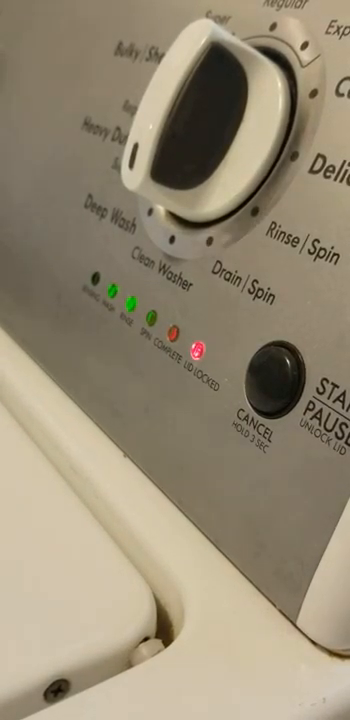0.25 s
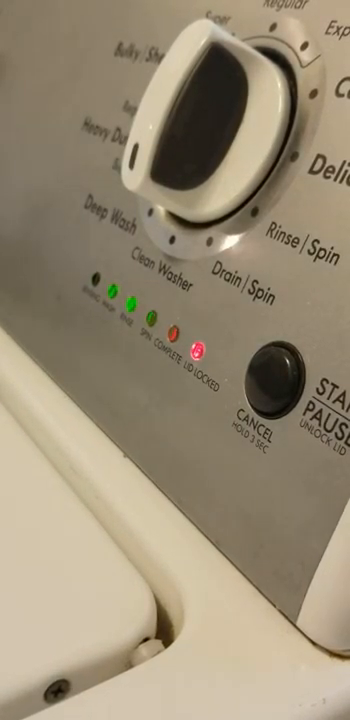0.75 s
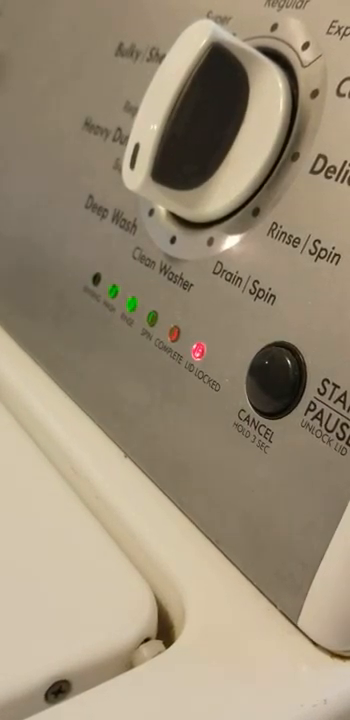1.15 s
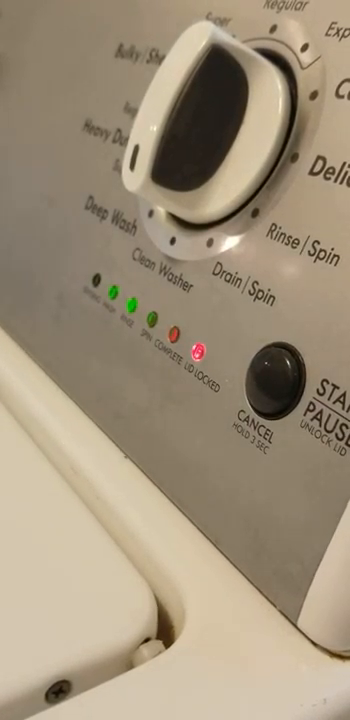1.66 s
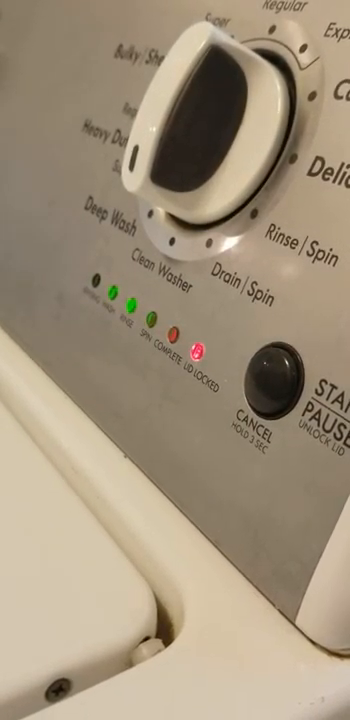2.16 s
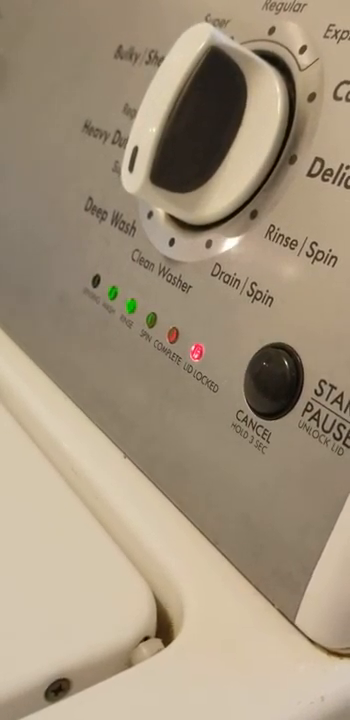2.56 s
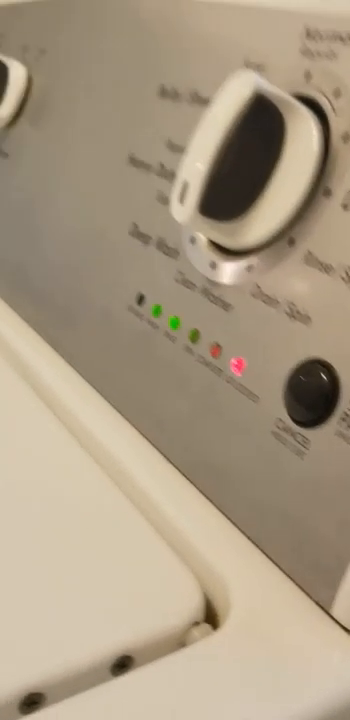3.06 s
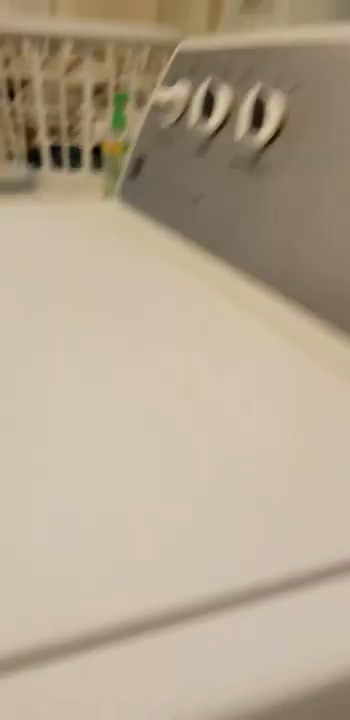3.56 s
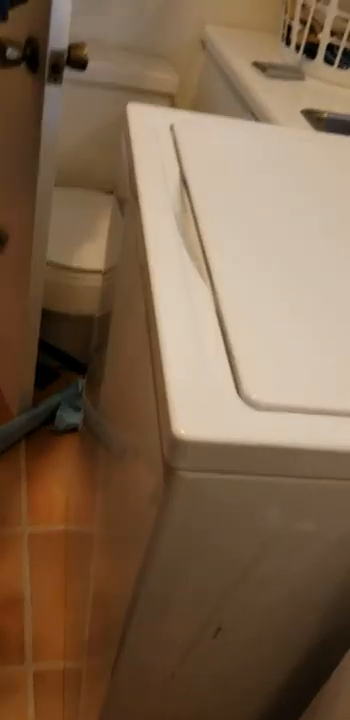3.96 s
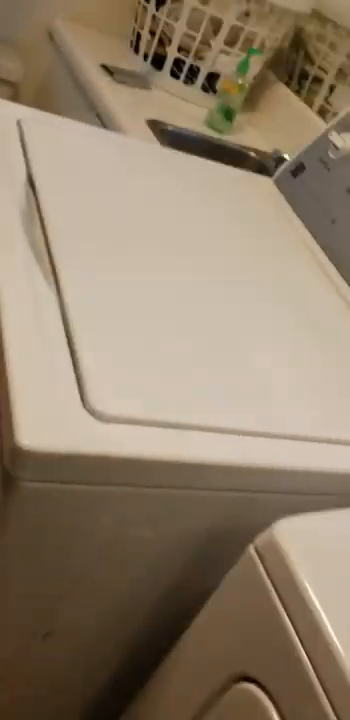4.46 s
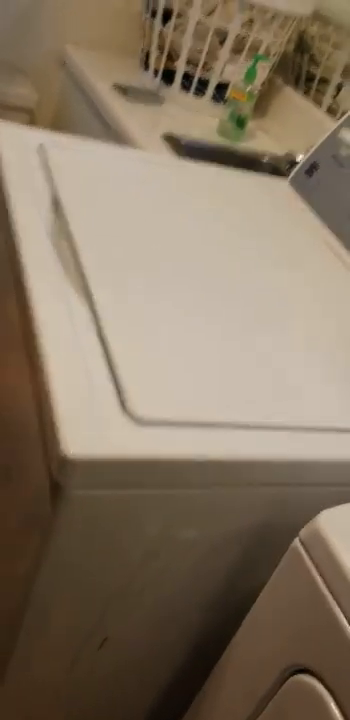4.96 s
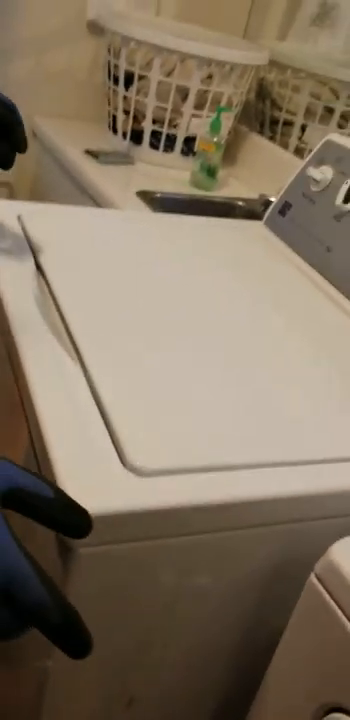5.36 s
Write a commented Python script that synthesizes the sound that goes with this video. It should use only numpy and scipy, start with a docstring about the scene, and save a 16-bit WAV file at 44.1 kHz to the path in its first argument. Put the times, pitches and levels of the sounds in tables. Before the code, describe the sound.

Inside a closed washing machine, water sprays in a bright, ragged hiss broken by many short splashes. The metal cabinet gives a low murmuring boom, strongest in the first two seconds. Around the middle come heavier spatters and small bubbly drips. Later the boom thins and a faint hollow gurgle shows more. Close stereo microphone in a small laundry room, brighter on the left.

```python
"""A spray hiss breaks into short splashes of changing colour: water sputters into a washing machine's closed tub.
Banded droplet noise makes the spray; random slugs of water ring the cabinet, lid and tub air
as a low boom, a murmur and a gurgle. Rising bubble tones mark single drops over a soft broad rumble.
The left microphone port faces the machine and hears more treble, in a small room."""
import sys
import numpy as np
from scipy import signal
from scipy.io import wavfile

SR = 44100
rng = np.random.default_rng(int(sys.argv[2]) if len(sys.argv) > 2 else 0)


def decibels_to_gain(level_db):
    """Convert a level in decibels to a linear amplitude gain (20 dB per decade)."""
    exponent = np.asarray(level_db, float) / 20
    return 10 ** exponent


def master_out(mix):
    """Clip the mix to full scale and print it as 16-bit PCM to the path in sys.argv[1]."""
    frames = np.transpose(np.atleast_2d(mix))
    ceiling = np.clip(frames, -1, 1)
    pcm = np.round(ceiling * 32767).astype(np.int16)
    wavfile.write(sys.argv[1], SR, pcm)


N = 247842  # samples

# colour of the pipe and room rumble, relative: frequency_hz [Hz], level_db [dB per Hz]
RUMBLE_COLOUR = [(30, -27), (161, -5), (241, 3.5), (383, -6), (599, -17), (1200, -42)]
# how hard the cabinet is shaken: start_s [s], level_db [dB]
CABINET_SHAKE = [(0.0, -34), (0.9, -33), (1.14, -31), (1.45, -28), (1.71, -34), (2.75, -38.5),
                 (2.96, -29.5), (3.4, -40.5), (3.79, -33.5), (3.96, -42.5), (4.08, -38), (4.5, -41.5),
                 (4.75, -33), (5.31, -42)]
# sheet-metal resonances, relative: pitch_hz [Hz], width_hz [Hz], level_db [dB]
CABINET_MODES = [(89.6, 28, -22.5), (221.6, 12.4, -7), (257.7, 11.2, -2), (328.5, 22.3, -17),
                 (437, 42, -22.5)]
# lid resonances, relative: pitch_hz [Hz], width_hz [Hz], level_db [dB]
LID_MODES = [(137.2, 7.8, 0), (519, 33.5, -0.5)]
# resonances of the air in the tub, relative: pitch_hz [Hz], width_hz [Hz], level_db [dB]
TUB_AIR_MODES = [(589.5, 51, 5), (655, 67, -0.5), (713, 90, -2), (816, 98, -4.5)]
# drops that trap a few bubbles and ring: start_s [s], level_db [dB], pitch_hz [Hz]
DROPS = [(2.381, -25, 3640), (2.384, -24, 2730), (3.105, -25, 4060), (3.216, -23, 4040),
         (3.254, -22.5, 5200), (3.3773, -23.5, 2555), (3.551, -24, 2550), (3.568, -36, 970),
         (3.627, -27.5, 2680), (4.243, -35, 2600), (4.514, -35, 1080), (5.063, -27, 3730),
         (5.421, -29.5, 614)]
# strength of the flow as spray hiss, before colouring: start_s [s], level_db [dB]
FLOW_STRENGTH = [(0.0, -32), (0.28, -27.5), (0.6, -29), (1.36, -28.5), (2.96, -28.5), (4.5, -30.5),
                 (5.62, -31.5)]
# loudest splashes, before colouring: start_s [s], level_db [dB], centre_hz [Hz],
# top_db [dB, top-treble share], t60_s [s]
LOUD_SPLASHES = [(0.26, -18.5, 4100, -16, 0.096), (0.4396, -22, 5600, -15, 0.21),
                 (0.7594, -22.5, 5470, -7, 0.3), (0.9177, -21, 5370, -15, 0.93),
                 (1.049, -20, 5200, -35, 0.16), (1.149, -18.5, 2630, -27, 0.31),
                 (1.254, -20.5, 4160, 5, 0.068), (1.306, -12.5, 4370, -24, 0.11),
                 (1.413, -18, 3300, -6, 0.12), (1.481, -25, 9000, 6, 0.062), (1.551, -21.5, 4300, -6, 0.42),
                 (1.598, -14.5, 3580, -5, 0.13), (1.77, -21, 5000, -11, 0.4), (2.022, -19, 3900, -2, 0.15),
                 (2.207, -14, 3900, -3, 0.13), (2.38, -19, 3080, -36, 0.27),
                 (2.411, -18.5, 2900, -16, 0.17), (2.775, -16.5, 2720, -18, 0.17),
                 (2.8216, -24.5, 5300, 11, 0.089), (2.887, -15, 4160, -5, 0.25),
                 (2.984, -19, 3740, -19, 0.28), (3.095, -22, 3900, -13, 0.54), (3.152, -20, 5900, -15, 0.1),
                 (3.253, -17.5, 4970, -25, 0.18), (3.371, -19, 2850, -11, 0.23),
                 (3.5457, -12.5, 3200, -23, 0.15), (3.563, -11, 5650, -8, 0.16),
                 (3.6232, -20.5, 2830, -25, 0.58), (3.7445, -16, 2950, -126, 0.17),
                 (3.864, -22, 4200, 8, 0.048), (3.922, -20, 6160, -12, 0.14), (3.998, -24, 3780, -6, 0.94),
                 (4.155, -18.5, 3230, -19, 0.063), (4.201, -22, 6600, -2, 0.079),
                 (4.2396, -20, 3700, -14, 0.61), (4.3314, -20.5, 5240, -1, 0.15),
                 (4.39, -24, 5500, 3, 0.094), (4.407, -18, 4200, -22, 0.29), (4.511, -19, 2010, -16, 0.14),
                 (4.523, -19.5, 5100, -2.5, 0.35), (4.613, -20, 4270, -14, 0.19),
                 (4.74, -24.5, 4600, -14, 0.4), (4.837, -23.5, 5340, 0, 0.42), (4.894, -24, 5330, 5, 0.34),
                 (5.099, -21.5, 4420, -5, 0.24), (5.159, -21, 1960, -18, 0.14),
                 (5.203, -21, 4270, -24, 0.22), (5.325, -25, 4200, 0, 0.12), (5.421, -18.5, 2300, -9, 0.13),
                 (5.527, -15.5, 3970, -37, 0.23), (5.554, -17, 4100, -18.5, 0.16)]
# colour of the spray, relative: frequency_hz [Hz], level_db [dB per Hz]
SPRAY_COLOUR = [(900, -6), (1120, -12.5), (1200, -26), (1340, -16.5), (2070, -7), (2420, -13.5),
                (2690, -8.5), (3260, -10), (3910, -4), (7770, -8.5), (15100, -1), (16000, -1.5)]
# tub-wall resonances that lift the spray: pitch_hz [Hz], width_hz [Hz], gain_db [dB]
TUB_WALL_MODES = [(1218, 20, 13.5), (1867, 13, 9.6), (2113, 18, 6.2), (2675, 34, 7.5), (3900, 21, 5.9),
                  (5160, 165, 3.8)]
# stereo width: frequency_hz [Hz], likeness [left-right, -1 to 1]
STEREO_LIKENESS = [(100, 0.86), (300, 1), (450, 0.97), (700, 0.28), (1250, 0.45), (2000, 0.052),
                   (4500, 0.059)]
# stereo balance: frequency_hz [Hz], lead_db [dB, left over right]
LEFT_OVER_RIGHT = [(60, 1.5), (550, 5), (1170, 1.5), (2700, 9.5), (4200, 3), (6600, 0.2), (10500, 2)]
# reflections that turn the right port's phase a full cycle: pitch_hz [Hz], width_hz [Hz]
RIGHT_TURNS = [(572, 30), (915, 71), (1350, 180)]
# dips in the right port's response: pitch_hz [Hz], width_hz [Hz], gain_db [dB]
RIGHT_DIPS = [(4700, 1500, -23)]

# shaking
LUMP_DB, LUMPS_HZ = 2.5, 5  # uneven swells in the boom, half as deep in the gurgle
THUMP_DB, THUMP_T60_S = 0, 0.49  # strength and fall of a splash's push on the boom
PLOP_DB, PLOP_T60_S = 6.5, 0.058  # the same for the gurgle
HEAVY_HZ = 3500  # splashes centred below this push hardest
# the lid murmur fades against the boom as the microphone draws back
LID_NEAR_DB, LID_FAR_DB = -8, -13.5
DRAW_BACK_S, DRAW_BACK_SPAN_S = 2.04, 0.21
# away from the lid the gurgle comes forward and its higher notes stand out
GURGLE_DB, GURGLE_FAR_DB = -42, 0.5  # base level; gain when away
GURGLE_FOLLOWS = 1  # share of the flow's swing
FAR_PITCH_RATIO, FAR_STEP_DB = 1.019, 0.9  # step: gain from each resonance to the next
# drops
BUBBLES, BUBBLE_GAP_S = 5, 0.006
BUBBLE_LOSS_DB, BUBBLE_SPREAD = 2.5, 0.1  # loss per later bubble; share by which its pitch strays
PLIP_RISE_S, PLIP_T60_S = 0.00038, 0.034
PLIP_GLIDE_PER_S = 1  # share by which pitch climbs each second
# spray
RING_DB = -24.5  # trapped-air ring against a loud splash
RAGGED_DB, SPIT_DB, SPITS_HZ = 2, 1.5, 90  # uneven splash colour; splashes break into spits
# right microphone port
RIGHT_LAG_SAMPLES, RIGHT_TOP_HZ = 7, 13540
CUTOFF_HZ = 15800  # top of both channels


def in_time(rows):
    """Reads the columns of a time curve at every sample."""
    s, *columns = np.transpose(rows)
    return [np.interp(np.arange(N) / SR, s, column) for column in columns]


def at_hz(points, hz):
    """Reads a spectrum curve on a log-frequency axis."""
    frequency_hz, value = np.array(points).T
    return np.interp(np.log(hz), np.log(frequency_hz), value)


def rms_one(x):
    """Scales a signal to unit rms."""
    return x / np.sqrt(np.mean(x ** 2) + 1e-20)


def drift(rate_hz):
    """Slow chance with spread 1: noise twice through a one-pole low-pass."""
    r = np.exp(-80 * np.pi * rate_hz / SR)  # made at SR / 40
    white = rng.standard_normal(N // 40 + 2002)
    slow = signal.lfilter([1], [1, -2 * r, r * r], white)[2000:]  # drop the filter's start-up
    return np.interp(np.arange(N) / 40, np.arange(len(slow)), rms_one(slow))


def resonance(x, hz, width_hz):
    """Two-pole resonance with unit gain at its peak."""
    r = np.exp(-np.pi * width_hz / SR)
    poles = [1, -2 * r * np.cos(2 * np.pi * hz / SR), r * r]
    return signal.lfilter([(1 - r * r) / 2, 0, (r * r - 1) / 2], poles, x)


def stereo(pair, hz):
    """Mixes two signals to the left-right likeness and balance at this frequency."""
    alike = np.clip(at_hz(STEREO_LIKENESS, hz), -1, 1)
    lead_db = at_hz(LEFT_OVER_RIGHT, hz)
    middle = np.sqrt(1 + alike) * pair[0]
    side = np.sqrt(1 - alike) * pair[1] * [[1], [-1]]
    return (middle + side) * decibels_to_gain(np.array([[lead_db / 2], [-lead_db / 2]]))


def bands(low_hz, high_hz, count, grain_db):
    """Bands of stereo noise whose samples scatter in size like droplets."""
    edges = np.geomspace(low_hz, high_hz, count + 1)
    white = rng.standard_normal((2, 2, N)) * decibels_to_gain(grain_db * rng.standard_normal((2, 2, N)))
    for k, (low, high) in enumerate(zip(edges, edges[1:])):
        hz = np.sqrt(low * high)
        band_pass = signal.butter(2, [low, high], "band", fs=SR, output="sos")
        # neighbouring bands take different noise
        yield hz, stereo(signal.sosfilt(band_pass, rms_one(white[k % 2])), hz)


def rumble():
    """Broad low noise of the pipes and the room, shaped band by band."""
    layers = (decibels_to_gain(at_hz(RUMBLE_COLOUR, hz)) * noise
              for hz, noise in bands(24.4, 1120, count=16, grain_db=2))
    return decibels_to_gain(-44) * rms_one(sum(layers))


def slugs(per_s, scatter_db):
    """Slugs of water strike at random, some much heavier than others."""
    struck = rng.random((2, N)) < per_s / SR
    weight = decibels_to_gain(scatter_db * rng.exponential(1, (2, N)))
    return rms_one(struck * weight * rng.choice([-1, 1], (2, N))) + 1e-18


def jolts(lift_db, t60_s):
    """Extra shaking in dB: splashes, low-pitched ones most, push harder for a moment."""
    s, _, centre_hz = np.transpose(LOUD_SPLASHES)[:3]
    hits = np.zeros(N)
    hits[(s * SR).astype(int)] = decibels_to_gain(lift_db) ** 2 / (1 + (centre_hz / HEAVY_HZ) ** 2)
    fall = decibels_to_gain(-120 / (t60_s * SR))  # of power, per sample
    return 10 * np.log10(1 + signal.lfilter([1], [1, -fall], hits + 1e-18))


def shaken(modes, level_db, push):
    """The blows set resonances ringing, each through a wide and a narrow filter."""
    rings = 0
    for k, (hz, width_hz, db) in enumerate(modes):
        ring = resonance(resonance(push, hz, 2.93 * width_hz), hz, width_hz)
        rings = rings + (-1) ** k * decibels_to_gain(db) * stereo(ring, hz)
    return rings / np.std(rings.mean(axis=0)) * decibels_to_gain(level_db)


def cabinet_boom(push, boom_db):
    """The sheet-metal cabinet booms in a few low resonances."""
    return shaken(CABINET_MODES, boom_db, push)


def lid_murmur(push, boom_db, away):
    """The lid rings under the same blows, fading against the boom as the microphone draws back."""
    return shaken(LID_MODES, boom_db + LID_NEAR_DB + (LID_FAR_DB - LID_NEAR_DB) * away, push)


def tub_gurgle(push, gurgle_db, away):
    """Air resonances in the tub gurgle; a brighter set takes over away from the lid."""
    far_modes = [(hz * FAR_PITCH_RATIO, width_hz, db + FAR_STEP_DB * k)
                 for k, (hz, width_hz, db) in enumerate(TUB_AIR_MODES)]
    near = shaken(TUB_AIR_MODES, gurgle_db, push)
    far = shaken(far_modes, gurgle_db + GURGLE_FAR_DB, push)
    return (1 - away) * near + away * far


def plips():
    """Each drop is a quick run of bubbles, short rising tones of nearly the same pitch."""
    out, t = np.zeros((2, N)), np.arange(SR // 10) / SR
    shape = decibels_to_gain(-60 * t / PLIP_T60_S) * (1 - np.exp(-t / PLIP_RISE_S))
    shape = shape / shape.max()
    climb = t + .5 * PLIP_GLIDE_PER_S * t ** 2
    for (s, db, hz), chance in zip(DROPS, rng.standard_normal((len(DROPS), BUBBLES, 4))):
        for k, (late, stray, *turns) in enumerate(chance):
            at = int((s + BUBBLE_GAP_S * k * (1 + .25 * late)) * SR)
            pitch_hz = hz * (1 + BUBBLE_SPREAD * stray * min(k, 1))  # the first bubble is true
            tone = np.sin(2 * np.pi * (pitch_hz * climb + np.c_[turns]))
            out[:, at:at + len(t)] += decibels_to_gain(db - BUBBLE_LOSS_DB * k) * stereo(tone * shape, hz)
    return out


def burst(t60_s, rise_s):
    """Envelope of one splash: quick rise, a short crack, exponential fall."""
    t = np.arange(int(SR * np.clip(t60_s, .02, .5))) / SR
    crack = 0.72 * np.exp(-t / 0.0043)
    return (decibels_to_gain(-60 * t / t60_s) + crack) * (1 - np.exp(-t / rise_s))


def loud_splashes():
    """The listed splashes with a common ring share."""
    s, peak_db, centre_hz, top_db, t60_s = np.transpose(LOUD_SPLASHES)
    return np.column_stack([s, peak_db, centre_hz, np.full_like(s, RING_DB), top_db, t60_s])


def small_splashes(hiss_db, per_s, over_db):
    """Random splashes in the same columns, following the strength of the spray."""
    when, pitch, ring, top, fall = rng.random((5, round(per_s * N / SR)))
    peak_db = hiss_db[(when * N).astype(int)] + over_db
    return np.column_stack([when * N / SR, peak_db, 2100 * 2 ** (2.94 * pitch), -30 + 19.3 * ring,
                            -15 + 24.7 * top, 0.021 + 0.063 * fall])


def trapped_air(starts, shapes, centre_hz, level_db, ring_share):
    """Air trapped by each splash rings at its centre pitch, driven by a puff of noise."""
    out, white = np.zeros((2, N)), rng.standard_normal((2, N))
    for at, shape, hz, db in zip(starts, shapes, centre_hz, level_db):
        width_hz = ring_share * hz
        puff = white[:, at:at + len(shape)] * shape[:N - at]
        ring = stereo(resonance(puff, hz, width_hz), hz)
        # narrow rings pass less noise: make up the level
        out[:, at:at + len(shape)] += decibels_to_gain(db) * ring * np.sqrt(SR / (np.pi * width_hz))
    return out


def tub_wall(water):
    """The tub wall rings on after each droplet, lifting the spray at its resonances."""
    return water + sum((decibels_to_gain(db) - 1) * resonance(water, hz, width_hz)
                       for hz, width_hz, db in TUB_WALL_MODES)


def spray(hiss_db, surge, splash_db, octaves, broad_db, patchy_db, ring_share):
    """Hiss and splashes share droplet noise; each splash lifts its centre, a little of all, and the top."""
    rows = np.vstack([loud_splashes(), small_splashes(hiss_db, per_s=95, over_db=1.5)])
    s, peak_db, centre_hz, ring_db, top_db, t60_s = rows.T
    shapes = [burst(fall, rise_s=0.0013) for fall in t60_s]
    starts = (s * SR).astype(int)
    out = 0
    for hz, noise in bands(948, 17170, count=24, grain_db=4.5):
        hiss = decibels_to_gain(2 * (hiss_db + patchy_db * (.5 * surge + drift(14.7))))  # power
        centred = np.exp(-.5 * (np.log2(hz / centre_hz) / octaves) ** 2)
        centred *= decibels_to_gain(2 * RAGGED_DB * rng.standard_normal(len(rows)))
        top = decibels_to_gain(2 * top_db) / (1 + (9500 / hz) ** 6)
        top *= decibels_to_gain(3.4 * rng.standard_normal(len(rows)))  # no two sound alike
        shares = decibels_to_gain(2 * peak_db) * (decibels_to_gain(2 * splash_db) * centred + decibels_to_gain(2 * broad_db) + top)
        splashed = np.zeros(N)
        for at, shape, share in zip(starts, shapes, shares):
            splashed[at:at + len(shape)] += share * shape[:N - at] ** 2
        spits = rms_one(decibels_to_gain(SPIT_DB * drift(SPITS_HZ))) ** 2
        out = out + decibels_to_gain(at_hz(SPRAY_COLOUR, hz)) * np.sqrt(hiss + splashed * spits) * noise
    out = out + trapped_air(starts, shapes, centre_hz, peak_db + ring_db, ring_share)
    return decibels_to_gain(1.5) * tub_wall(out)


def scene():
    """Layers rumble to spray; surges in the flow shake cabinet and tub alike."""
    hiss_db, = in_time(FLOW_STRENGTH)
    shake_db, = in_time(CABINET_SHAKE)
    surge = drift(19.0)
    lumps_db = LUMP_DB * drift(LUMPS_HZ)
    boom_db = shake_db + lumps_db + 0.68 * surge + jolts(THUMP_DB, THUMP_T60_S)
    flow_swing_db = GURGLE_FOLLOWS * (hiss_db - hiss_db.mean())
    gurgle_db = GURGLE_DB + .5 * lumps_db + flow_swing_db + 0.42 * surge + jolts(PLOP_DB, PLOP_T60_S)
    # 0 near the lid, 1 drawn back
    away = 1 / (1 + np.exp((DRAW_BACK_S - np.arange(N) / SR) / DRAW_BACK_SPAN_S))
    push = slugs(per_s=250.0, scatter_db=2.5)
    body = cabinet_boom(push, boom_db) + lid_murmur(push, boom_db, away)
    gurgle = tub_gurgle(push, gurgle_db, away)
    water = spray(hiss_db, surge, splash_db=0.12, octaves=0.57, broad_db=-13.0,
                  patchy_db=2.0, ring_share=0.11)
    return rumble() + body + gurgle + plips() + water


def top_cut(x):
    """Nothing passes above the cut-off."""
    return signal.sosfilt(signal.butter(12, 16800, fs=SR, output="sos"), x)


def record(dry):
    """The shaded right port hears late, with turned phase, a dip and a dull top; both tops are cut steeply."""
    left, right = dry
    right = np.concatenate([np.zeros(RIGHT_LAG_SAMPLES), right[:-RIGHT_LAG_SAMPLES]])
    for hz, width_hz in RIGHT_TURNS:
        right = right - 2 * resonance(right, hz, width_hz)  # all-pass
    for hz, width_hz, db in RIGHT_DIPS:
        right = right + (decibels_to_gain(db) - 1) * resonance(right, hz, width_hz)
    right = signal.sosfilt(signal.cheby2(3, 22.0, RIGHT_TOP_HZ, fs=SR, output="sos"), right)
    steep_cut = signal.ellip(14, .5, 65, CUTOFF_HZ, fs=SR, output="sos")
    mix = signal.sosfilt(steep_cut, [left, right])
    return top_cut(mix)


dry = scene()
out = record(dry)
master_out(out)
```